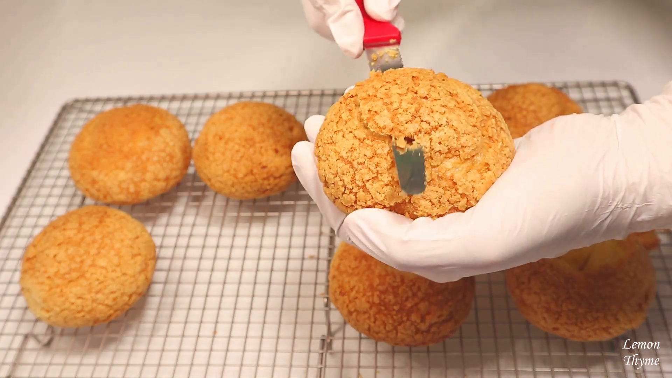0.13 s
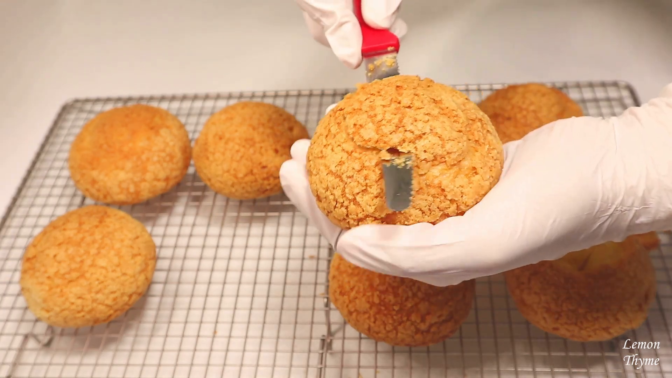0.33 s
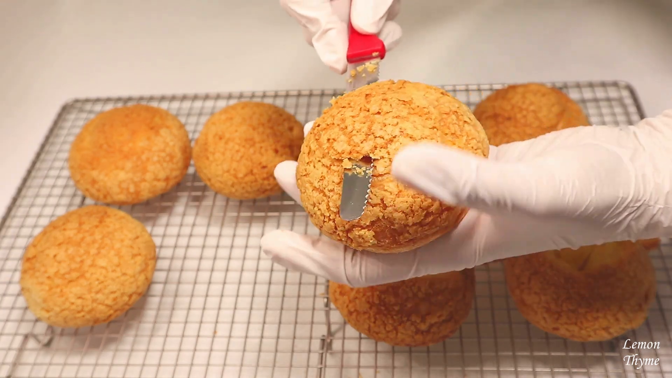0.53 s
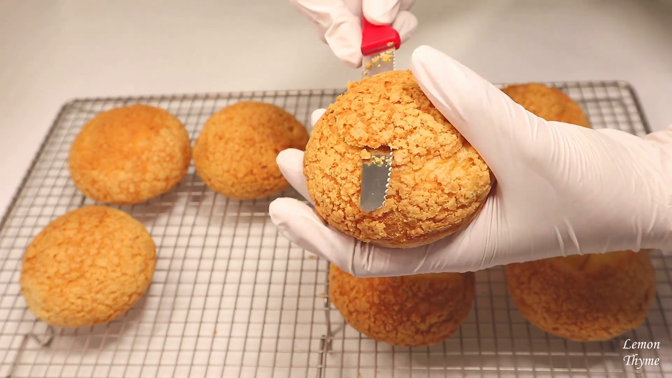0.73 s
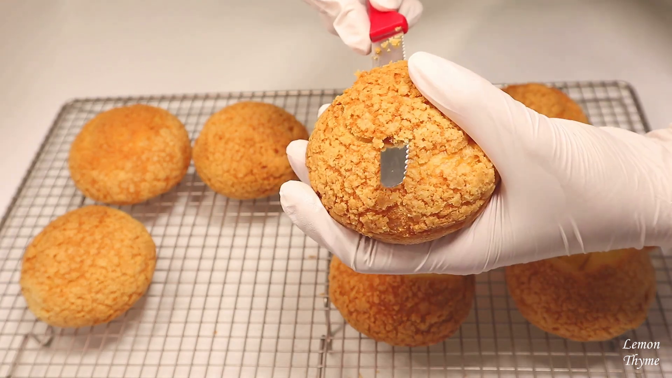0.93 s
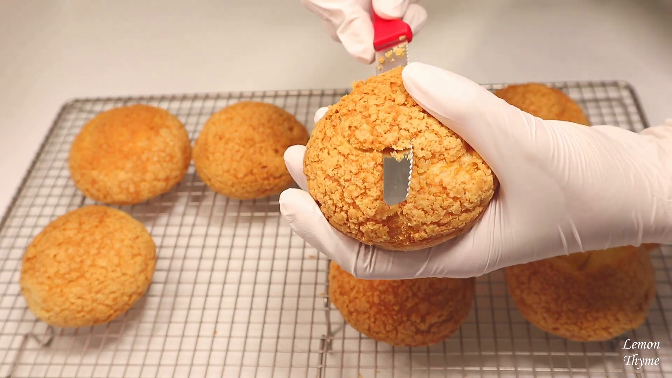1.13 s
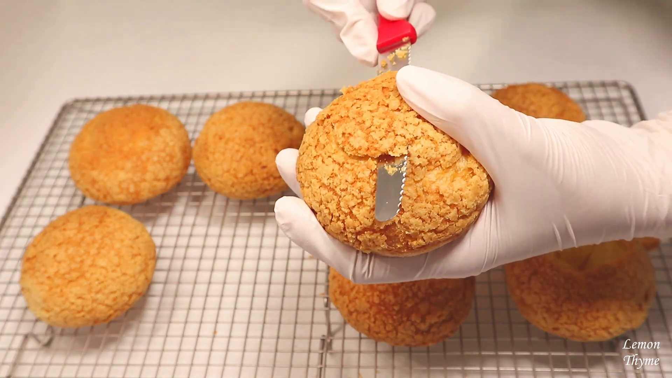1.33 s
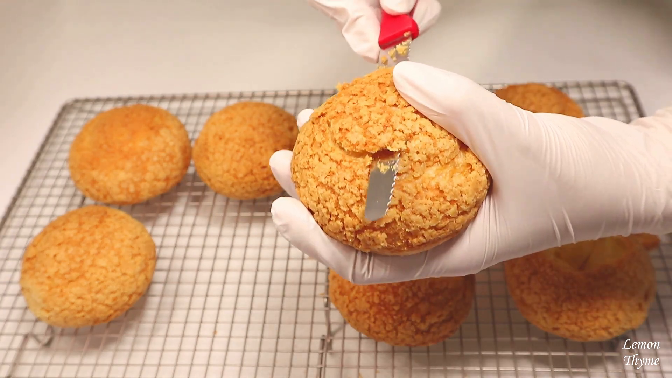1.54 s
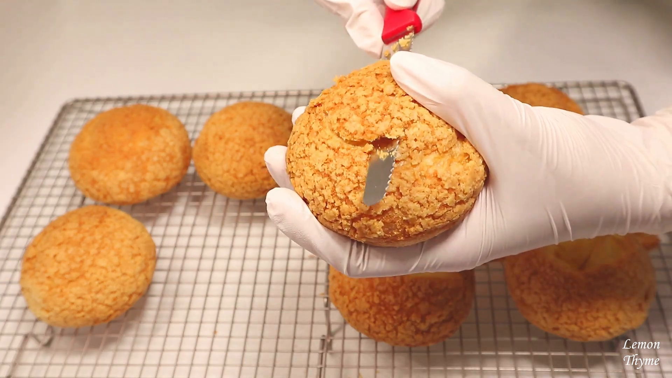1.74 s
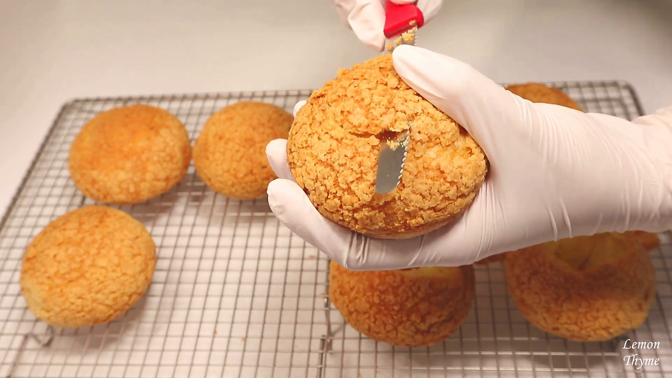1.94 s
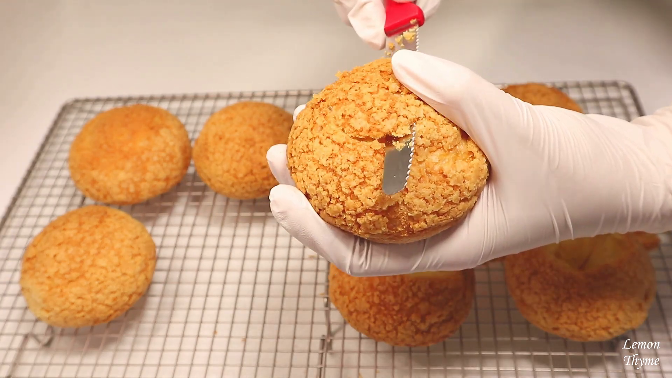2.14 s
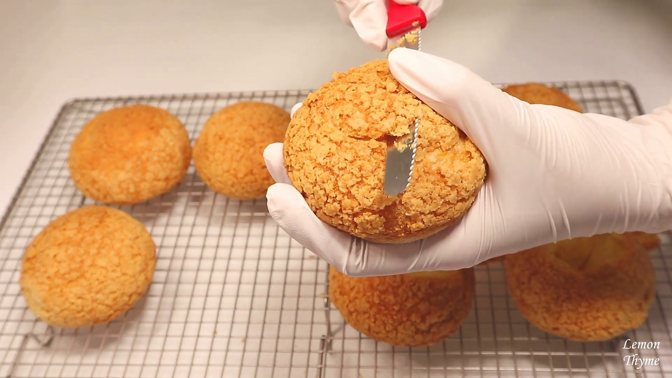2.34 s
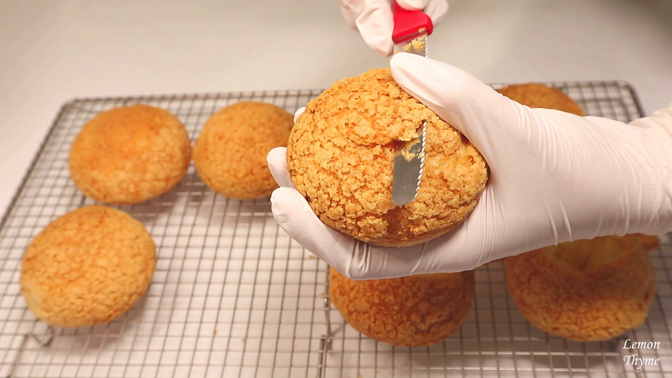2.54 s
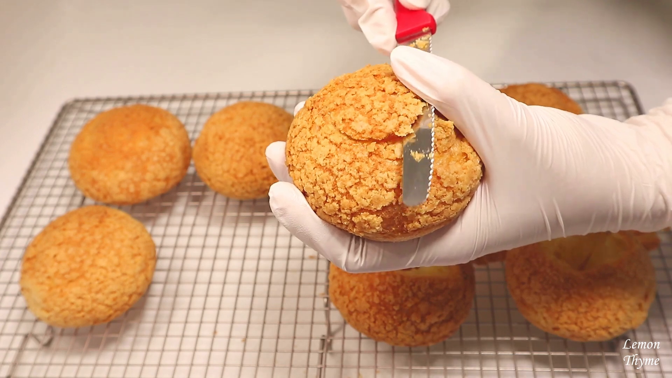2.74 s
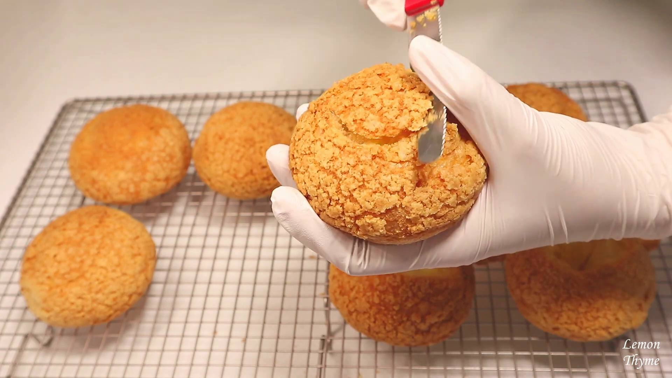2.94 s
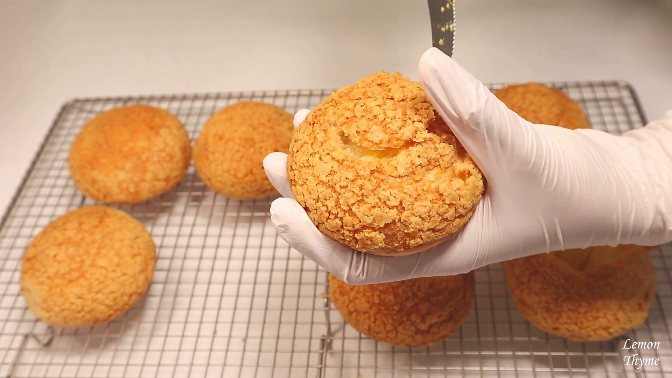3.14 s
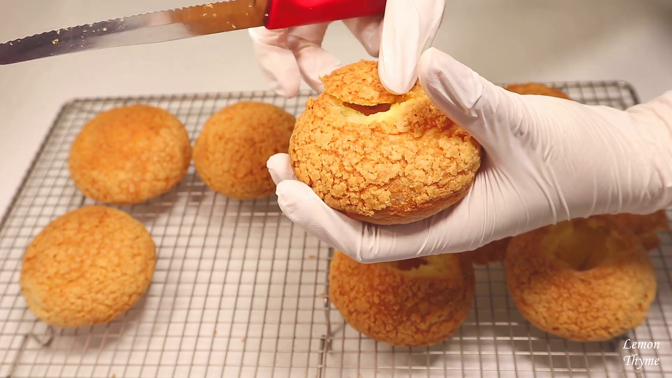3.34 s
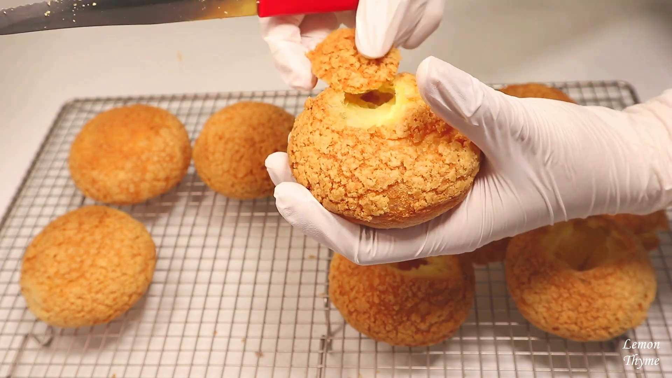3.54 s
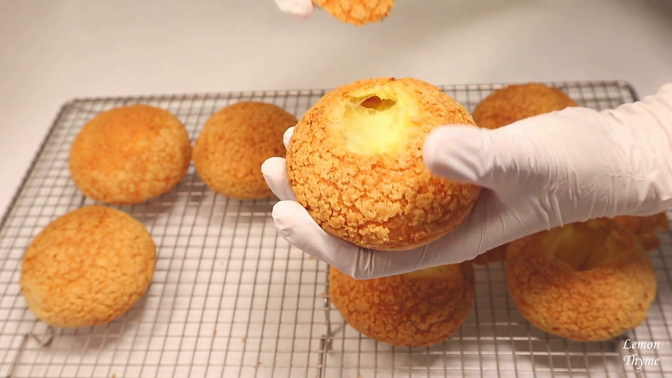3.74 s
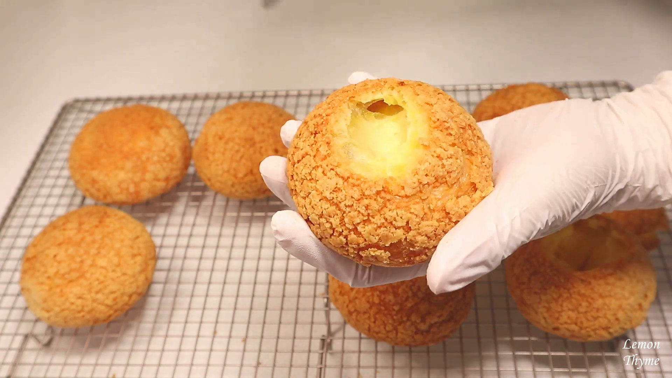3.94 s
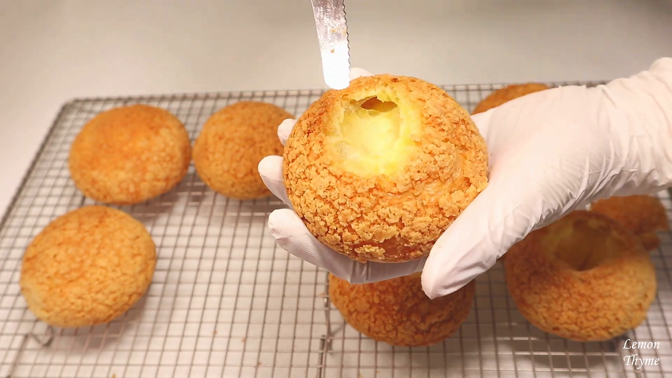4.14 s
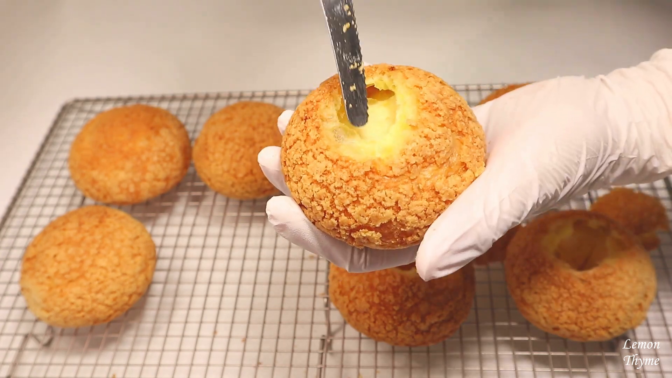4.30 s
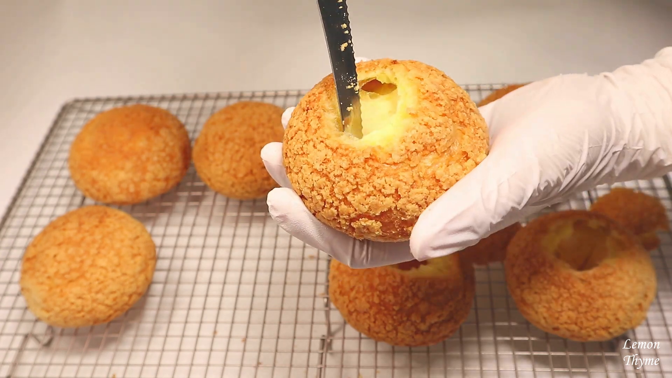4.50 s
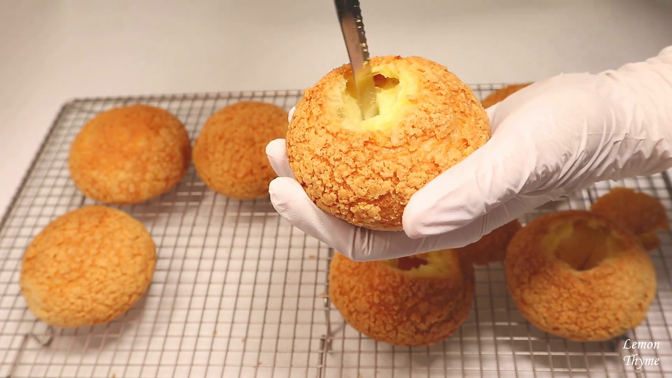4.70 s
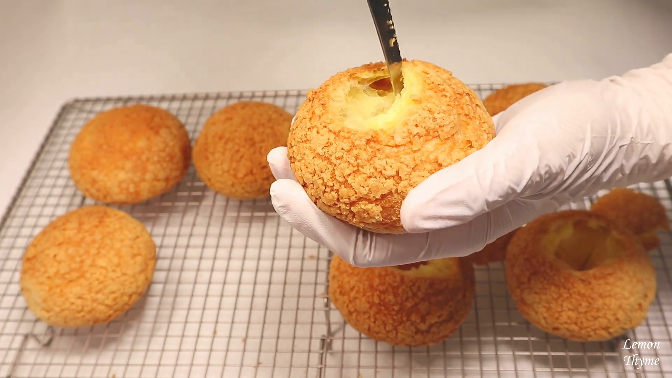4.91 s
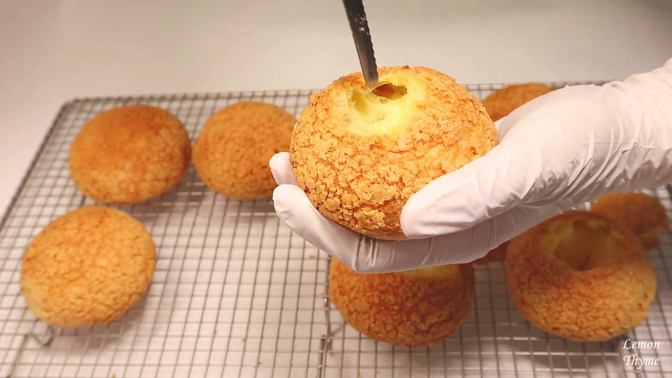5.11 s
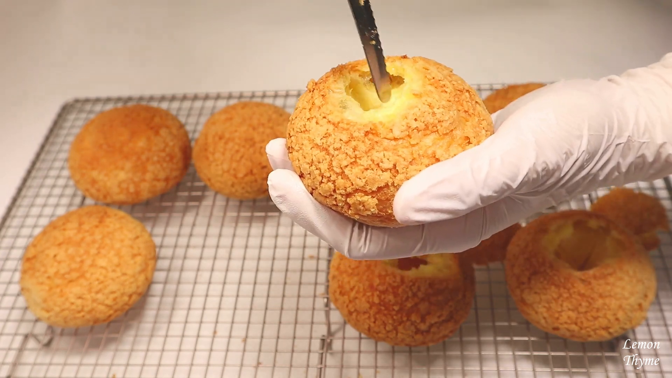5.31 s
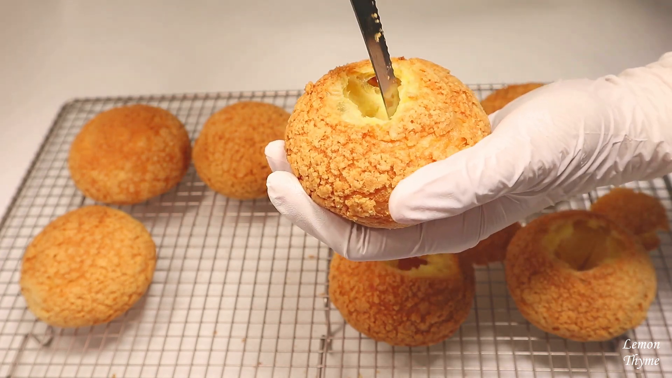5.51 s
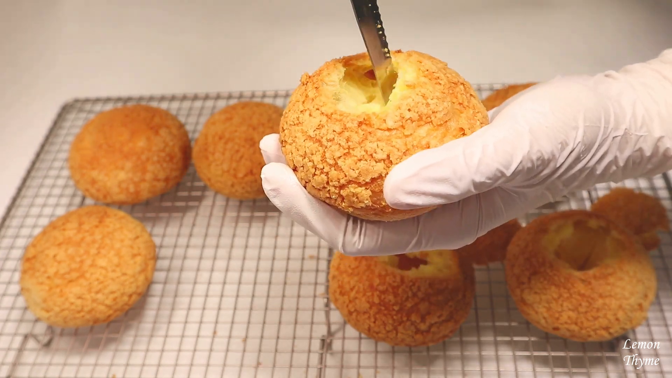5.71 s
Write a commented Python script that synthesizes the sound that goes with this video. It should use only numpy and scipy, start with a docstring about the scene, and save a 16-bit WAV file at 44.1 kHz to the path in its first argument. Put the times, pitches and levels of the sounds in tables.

```python
"""Knife sawing a crisp pastry puff

A small serrated knife saws round the crust of a hollow puff held near a stereo microphone: bursts of
crunch are tiny random fractures through crust, fizz and hollow resonances. Larger flakes snap singly
as ringing jolts; thumps are decaying sines. The lid is pulled off, then the blade probes the soft inside
with a few ticks and a dull knock. Behind lies a quiet kitchen of filtered noise and a narrow hum."""
import sys
import numpy as np
from scipy import signal
from scipy.io import wavfile
from scipy.ndimage import uniform_filter1d

SR = 44100
rng = np.random.default_rng(int(sys.argv[2]) if len(sys.argv) > 2 else 0)


def unload_audio(sound):
    """Save the sound as a 16-bit wav file, at the path given as the first command line argument."""
    columns = np.transpose(np.atleast_2d(sound))
    # keep every value between -1 and 1, then stretch to whole-number steps
    steps = np.round(np.clip(columns, -1, 1) * 32767)
    wavfile.write(sys.argv[1], SR, steps.astype(np.int16))


N = 258426

# Bursts of crunch: blade strokes, crumbling after snaps, lid pulls and late probing. Each row: middle in
# seconds, half length in seconds, level in dB, depth in dB re level, fizz in dB re level, crust pitch in Hz.
CRUNCHES = [(0.024, .017, -49, 1, 9.5, 930), (0.119, 0.025, -51.5, 3.5, -4, 1230),
            (.21, 0.023, -52.5, 0.5, -4, 990), (.265, 0.024, -45.5, -5.5, -5, 2030),
            (0.374, 0.033, -50, -4, -7, 1950), (.438, 0.033, -58, -5, 4, 1099),
            (0.587, 0.022, -56, -15, 7.5, 2500), (0.795, .023, -54.5, -28, 1, 4830),
            (.919, 0.024, -57.5, -6, -6, 1260), (1.02, 0.047, -54.5, -11, -3.5, 1190),
            (1.147, 0.028, -50, 0, -0.5, 1950), (1.285, 0.013, -46.5, -1, -1.5, 930),
            (1.389, 0.033, -50.5, -1, -11, 1305), (1.664, .028, -45.5, -6, -1.5, 1870),
            (1.891, .02, -47, -9.5, 2, 2670), (2.019, 0.0066, -39, -8.5, -10, 1370),
            (2.099, 0.022, -43.5, -3.5, -8, 1850), (2.237, 0.029, -49.5, -6, -3, 1350),
            (2.337, 0.031, -41, -4.5, -3.5, 2600), (2.449, 0.034, -48.5, -3.5, -4.5, 3960),
            (2.568, 0.029, -39, -8.5, -2.5, 2360), (2.676, 0.03, -39, -6.5, -6.5, 1285),
            (2.743, 0.064, -50.5, -2.5, -2.5, 2560), (2.848, 0.0084, -51, -35, 6, 6960),
            (2.892, 0.043, -58.5, -35, 3.5, 5200), (3.143, .032, -45, -7.5, 4, 2260),
            (3.228, 0.014, -45.5, -35, 2.5, 2620), (3.334, 0.043, -50, -4.5, 0.5, 1040),
            (3.385, 0.028, -51, -1.5, -2.5, 1000), (3.454, 0.01, -57.5, -25, 8, 6700),
            (3.489, 0.018, -47.5, -5, 7, 1000), (3.536, 0.02, -43, -9, 1, 2440),
            (3.62, 0.013, -37.5, -17, -2, 2400), (3.708, 0.023, -56, -10, 11.5, 2700),
            (4.685, .018, -61, -5.5, -14, 1660), (4.799, 0.013, -71.5, 10.5, -6, 805),
            (4.94, 0.018, -66.5, -3, -10, 930), (5.08, 0.096, -73, -3, 4, 4100),
            (5.624, 0.031, -80.5, -8, 13, 3120), (5.852, .013, -60.5, 6, -25, 910)]
# Single snaps of flakes. Each row: start in seconds, nominal level in dB, pitch in Hz,
# crack in dB re level, bright tick in dB re level.
SNAPS = [(.007, -19, 9300, -1.5, 3.5), (0.0257, -20.5, 6700, -10, -17), (.0296, -21.5, 6900, -26, -3.5),
         (.0754, -35.5, 1980, -10, 0), (0.0817, -32.5, 916, 3, 2), (0.1057, -36, 1210, 0, -4),
         (0.1435, -33.5, 1370, 0, -11), (.213, -35, 927, -9, -10), (0.2484, -30.5, 905, -19, 5),
         (0.2536, -29.5, 2197, -6, -8), (.273, -29.5, 2090, 7, 2), (.3457, -34, 2440, 1, -3),
         (0.4323, -31, 6160, -15, -14), (0.4456, -40.5, 830, -1, -3), (0.535, -43, 1410, -2, -2),
         (0.5711, -43, 1540, 4, -9), (0.6693, -13.5, 3760, -22, -21), (0.6996, -23.5, 2900, -33, -2),
         (0.75, -34, 4680, -24, -18), (0.7713, -33, 6140, -11, -11), (.836, -44, 1050, 10.5, 0),
         (0.9116, -41, 1040, -2, 4), (.9745, -35.5, 3340, 11, 2), (1.0979, -36.5, 1400, -4, -7),
         (1.2444, -42.5, 2710, 10, 7), (1.2871, -35, 1600, -22, 0.5), (1.335, -44.5, 920, -6, 4),
         (1.3746, -26, 1380, -1.5, -4.5), (1.3866, -33, 1390, -6, -6), (1.436, -21.5, 1150, -4.5, -12),
         (1.5029, -32.5, 1270, 12, -1), (1.5253, -39, 1200, 8, -3), (1.5321, -32, 1320, 6.5, -6),
         (1.6624, -32, 2000, 11, 3), (1.7599, -40, 3320, 11, 5), (1.768, -21, 4030, -3, 1),
         (1.8273, -13.5, 3670, -15, -18), (1.849, -31, 3500, -9, -17), (1.8863, -49, 820, 0, 2),
         (1.8979, -30.5, 2340, -27, 2.5), (1.9648, -37.5, 2483, 3, -1), (2.0177, -34.5, 2030, 12.5, 0),
         (2.0922, -26.5, 2330, 7.5, -6), (2.2299, -32, 3740, -8, -18), (2.244, -41, 1400, -17, 4),
         (2.2863, -40, 1040, -5, 2), (2.3488, -20, 2440, -3, -16), (2.43, -26, 3830, -6, -12),
         (2.4549, -27.5, 3924, -9, -4), (2.5432, -26, 2210, -26, -4), (2.6302, -29.5, 4636, 4, -0.5),
         (2.6845, -32.5, 2630, -12, 5), (2.7364, -30.5, 2550, 5, 0), (2.7763, -24, 3140, -16, -0.5),
         (2.79, -34, 2900, -6, -8), (2.8423, -12, 6850, -24, -8), (2.9397, -23.5, 7120, -11, -15),
         (3.0749, -42.5, 1890, 13.5, 3), (3.0859, -40, 2000, 12.5, -13), (3.1286, -21.5, 4774, -20, -23),
         (3.2209, -26.5, 2750, -19, 1.5), (3.293, -39, 2720, -16, 4), (3.3188, -31.5, 1060, 7, -3),
         (3.338, -23.5, 4600, -6, -13), (3.449, -21.5, 6500, -21, -2), (3.4835, -22.5, 990, -1.5, -4.5),
         (3.5366, -12, 2300, -26, -7.5), (3.5511, -22.5, 2390, -9, -21), (3.5905, -34, 4330, 7, 7),
         (3.597, -31, 2390, 1, -3), (3.6133, -31, 2380, 5, -18), (3.6182, -15, 2500, 2, -5.5),
         (3.646, -36, 2490, 12.5, -15), (3.6824, -33, 4300, 5, -20), (3.6962, -28, 2820, -9, 0),
         (3.7385, -26, 5030, -14, -10), (3.769, -29, 2700, -21, -0.5), (3.812, -17, 2880, -2, 3.5),
         (3.9103, -29, 2520, -14, -19), (4.485, -29, 2250, 8, -15), (4.516, -31.5, 8160, -1, -9),
         (4.68, -49, 1670, 1, -8), (4.8891, -45.5, 4020, -22, 0), (4.928, -46.5, 6230, -30, 3),
         (5.8037, -36, 1010, -9, -20), (5.853, -42, 1000, -8, -20)]
# Rustle of crumbs and gloved hand. Each row: time in seconds, level in dB, brightness in dB re level.
RUSTLE = [(0, -58, 9), (.23, -58.5, -4.5), (.44, -70.5, 9.5), (.9, -71.5, 10), (1.21, -63.5, -1.5),
          (1.89, -61.5, 4), (2.2, -70.5, 8.5), (2.75, -70.5, 10), (3.0, -75.5, 14.5), (3.4, -69, 1.5),
          (3.55, -46.5, -11), (3.72, -49, -4), (3.82, -56.5, 10.5), (4.0, -66, 13), (4.1, -75, 9),
          (4.91, -80.5, 10), (5.21, -86.5, 7)]
# Dull thumps as the shell gives way. Each row: start in seconds, nominal level in dB, pitch in Hz.
THUMPS = [(0.272, -34, 129), (0.384, -37, 142), (1.149, -38.5, 90), (1.887, -39.5, 496), (2.348, -53, 239),
          (2.691, -32.5, 99), (2.74, -35.5, 204), (3.0771, -31.5, 460), (3.086, -33, 490),
          (3.131, -30, 440), (3.15, -29.5, 515), (3.319, -31, 163), (4.806, -55, 139), (5.8038, -34.5, 474)]
# Modes of the loosened lid and rim. Each row: frequency in Hz, width in Hz, gain in dB.
LID_MODES = [(2390, 420, -0.5), (4350, 310, -1), (6060, 700, -0.5), (8100, 800, -2), (11600, 1600, -13.5)]
# Share of the sound that passes the lid and rim modes. Each row: time in seconds, share from 0 to 1.
LOOSE_SHARE = [(3.49, 0), (3.52, 0.34), (3.7, 0.7), (4.0, 0.19), (4.4, 0.82), (4.6, 0.57), (4.66, 0)]
# Spectrum of the crust crunch. Each row: frequency in Hz, relative gain in dB.
BODY_TONE = [(350, -33.5), (600, -13), (722, 2.5), (1420, 3), (1780, -2), (2040, 4), (3550, 2), (4020, 2.5),
             (7000, -3), (9100, -22), (15400, -120)]
# Spectrum of the finest fractures. Each row: frequency in Hz, relative gain in dB.
FIZZ_TONE = [(2650, -12), (4500, -9), (7920, -10), (8690, -11), (12400, -10.5), (15500, -14.5),
             (16200, -18), (16500, -92.5)]
# Spectrum of the push through the palm. Each row: frequency in Hz, relative gain in dB.
THUD_TONE = [(29, -50), (50, -8), (92, 1.5), (222, 0.5), (330, -1.5), (430, -23), (730, -120)]
# Reflections off nearby surfaces. Each row: left delay in seconds, right delay in seconds, gain in dB.
ECHOES = [(.0011, .0008, -29.5), (.0027, 0.0035, -14), (.0052, .0046, -16.5)]
# Spectrum of the hiss. Each row: frequency in Hz, relative gain in dB.
HISS_TONE = [(65, -53), (110, -10.5), (171, -5.5), (271, -8.5), (439, -12.5), (726, -18), (2160, -21),
             (3280, -22.5), (14500, -24), (15500, -24), (16500, -17.5)]
# Left-right likeness of hiss and rumble. Each row: frequency in Hz, correlation from -1 to 1.
ROOM_SAME = [(30, 0.31), (300, 0.31), (3000, 0), (12000, 0.04)]
# Course of the low kitchen rumble. Each row: time in seconds, level in dB.
RUMBLE_COURSE = [(0, -59.5), (0.519, -54.5), (.93, -60), (1.68, -61), (3.95, -56), (4.32, -58.5),
                 (5.86, -62)]
# Spectrum of the rumble. Each row: frequency in Hz, relative gain in dB.
RUMBLE_TONE = [(7.1, -40), (12, 1), (65, 3.5), (130, -13.5), (170, -8.5), (290, -120)]
# Brief dip of the whole level. One row: middle in seconds, half width in seconds, gain in dB.
DIP = (3.2775, .0105, -24)

HOLLOW_HZ, HOLLOW_WIDTH_HZ = 480, 210  # air inside the shell
RISE_SHARE = 0.61  # part of a burst that lies before its top
THUD_DB, HOLLOW_DB, CRUST_RING_DB = -0.5, -2.5, -5  # thud and hollow re depth, crust ring re level
FLAKE_DB, CRUMBLE_DB = -3.5, -15.5  # flake ring re snap level, crumbling re first jolt
FLAKE_WIDTH, FLAKE_SKIRT = 0.31, 0.63  # ring widths as a share of the pitch
SNAP_HOLLOW_DB, HOLLOW_DB_PER_OCTAVE = -14.5, -12  # hollow at a 1 kHz flake; smaller flakes stir it less
SNAP_PAN_DB, PAN_SPREAD_DB = -2.5, 1  # left minus right
SPRAY_SHARE, SPRAY_S = 0.7, 0.0012  # finest splinters around a break
# lows of the rustle: strong while the blade saws, thin from the end of the cut
RUSTLE_DEPTH_DB, CUT_THROUGH_DEPTH_DB, CUT_THROUGH_S = 9, -12, 2.75
THUMP_DAMPING_PER_S, DAMPING_PER_CYCLE = 66, 0.44
HISS_DB = -63
HUM_HZ, HUM_WIDTH_HZ, HUM_DB = 60, 3.5, -63
EDGE_HZ = 15900  # upper band limit


def crunch():
    """Dense breaks in each burst drive crust, fizz and hollow shell; a thinner rustle runs between."""
    coarse = fractures(5000, 1.8, 0.97)
    fine = fractures(9000, 1.2, 0.2)
    body = colour(flakes(coarse), BODY_TONE)
    fizz = colour(fine + 1.23 * coarse, FIZZ_TONE)
    thud = colour(fractures(800, 3, 0.6), THUD_TONE)
    hollow = evened(hollow_ring(fractures(1500, 1.8, 0.98)))
    out = np.zeros((2, N))
    for middle_s, half_s, db, depth_db, fizz_db, hz in CRUNCHES:
        rise_s, fall_s = 2 * half_s * RISE_SHARE, 2 * half_s * (1 - RISE_SHARE)
        top_s = middle_s + (rise_s - fall_s) / 2
        t = np.arange(-3 * rise_s, 3 * fall_s, 1 / SR)
        at = np.clip(((top_s + t) * SR).astype(int), 0, N - 1)
        crust = evened(ring(ring(coarse[:, at], hz, 1.0 * hz), hz, 0.29 * hz))
        layers = [(body, 0), (thud, depth_db + THUD_DB), (hollow, depth_db + HOLLOW_DB), (fizz, fizz_db)]
        sound = gain_of(CRUST_RING_DB) * crust
        sound = sound + sum(gain_of(layer_db) * layer[:, at] for layer, layer_db in layers)
        envelope = np.exp(-1.2 * (t / np.where(t < 0, rise_s, fall_s)) ** 2)
        add(out, top_s + t[0], gain_of(db) * sound * envelope)
    out += rustle_between(hollow)
    return out * gain_of([[-1.6], [1.6]])  # leans right


def rustle_between(hollow):
    """Crumbs break continuously; level, brightness and share of lows follow the time courses."""
    t = np.arange(N) / SR
    s, level_db, bright_db = np.transpose(RUSTLE)
    level_db, bright_db = np.interp(t, s, level_db), np.interp(t, s, bright_db)
    depth_db = np.interp(t, [CUT_THROUGH_S, CUT_THROUGH_S + 0.076], [RUSTLE_DEPTH_DB, CUT_THROUGH_DEPTH_DB])
    crumbs = fractures(4000, 1.4, 0.79)
    rustle = colour(flakes(crumbs), BODY_TONE)
    lows = signal.sosfiltfilt(signal.butter(2, 1700, fs=SR, output="sos"), rustle)
    deep = gain_of(depth_db) * (lows + 0.18 * hollow)
    bright = gain_of(bright_db) * colour(crumbs, FIZZ_TONE)
    return gain_of(level_db) * (rustle - lows + deep + bright)


def fractures(per_s, spread_db, same):
    """Random clumped breaks, most small, a few large; each reaches the two ports partly alike."""
    size_db = spread_db * np.minimum(rng.exponential(1, N), 4) + 3.1 * drift(170)
    size = gain_of(size_db) * (rng.random(N) < per_s / SR)
    shared, *apart = rng.standard_normal((3, N))
    same = np.clip(same, 0, 1)
    return evened(size * (same * shared + np.sqrt(1 - same ** 2) * np.array(apart)))


def flakes(breaks, count=10):
    """Every break belongs to a flake of some size and rings briefly at that flake's pitch."""
    which = rng.integers(0, count, N)
    pitches_hz = np.geomspace(750, 6500, count) * rng.uniform(1.0, 1.056, count)
    return sum(evened(ring(breaks * (which == k), hz, 0.16 * hz)) * np.sqrt(hz)
               for k, hz in enumerate(pitches_hz))


def hollow_ring(x):
    """Air in the shell: two damped resonances in series at one pitch, the second twice as wide."""
    return ring(ring(x, HOLLOW_HZ, HOLLOW_WIDTH_HZ), HOLLOW_HZ, 2 * HOLLOW_WIDTH_HZ)


def snaps():
    """A flake breaks in one jolt, then crumbles; it rings a few cycles over crack, tick and hollow."""
    out, t = np.zeros((2, N)), np.arange(1300) / SR
    crack_band = signal.butter(2, [1000, 6000], "bandpass", fs=SR, output="sos")
    tick_band = signal.butter(2, [6000, 13000], "bandpass", fs=SR, output="sos")
    chances = rng.standard_normal((len(SNAPS), 4, 1300))
    for (s, db, hz, crack_db, tick_db), chance in zip(SNAPS, chances):
        hollow_db = SNAP_HOLLOW_DB + HOLLOW_DB_PER_OCTAVE * np.log2(hz / 1000)
        pan_db = SNAP_PAN_DB + PAN_SPREAD_DB * chance[0, -1]
        crumbs = 0.73 * chance[0] + 0.5 * chance[1:3]
        crumbs = crumbs * (abs(chance[3]) > 1.2) * np.exp(-t / 0.0037)
        # rows: first jolt left and right, crumbling left and right
        jolts = np.stack([t == 0, t == 0, *(gain_of(CRUMBLE_DB) * crumbs)])
        flake = ring(ring(jolts, hz, FLAKE_WIDTH * hz), hz, FLAKE_SKIRT * hz)
        # finest splinters scatter over a millisecond and differ between the ports
        splinters = np.stack([*chance[1:3], 0 * t, 0 * t])
        spray = jolts + splinters * SPRAY_SHARE * np.exp(-t / SPRAY_S)
        crack = signal.sosfilt(crack_band, jolts)
        tick = signal.sosfilt(tick_band, spray)
        parts = [(flake, FLAKE_DB), (crack, crack_db), (tick, tick_db), (hollow_ring(jolts), hollow_db)]
        # each part is scaled by its peak without the crumbling
        sound = sum(gain_of(part_db) * (p[:2] + p[2:]) / abs(p[:2]).max() for p, part_db in parts)
        add(out, s, gain_of(db + np.array([[0.5], [-0.5]]) * pan_db) * sound)
    return out


def lid(x):
    """Once cut free, the lid and rim colour every break with their ring."""
    loose = np.clip(np.interp(np.arange(N) / SR, *np.transpose(LOOSE_SHARE)), 0, 1)
    # pi * width / SR brings each mode to gain 1 at its centre
    modes = sum(gain_of(db) * np.pi * width / SR * ring(x, hz, width) for hz, width, db in LID_MODES)
    return (1 - loose) * x + loose * gain_of(1.5) * modes


def thumps():
    """Each is a low swing with a soft start that dies in a few cycles."""
    out, t = np.zeros(N), np.arange(3000) / SR
    for s, db, hz in THUMPS:
        decay = np.exp(-(THUMP_DAMPING_PER_S + DAMPING_PER_CYCLE * hz) * t)
        onset = 1 - np.exp(-6.0 * hz * t)
        add(out, s, gain_of(db) * np.sin(2 * np.pi * hz * t) * decay * onset)
    return out * gain_of([[-2.2], [2.2]])  # leans right


def surroundings(x):
    """Path difference to the left port, a few near echoes and a short kitchen tail, unlike in each ear."""
    t = np.arange(12000) / SR
    taps = rng.standard_normal((2, len(t))) * gain_of(-60 * t / 0.176) * (t > 0.006)
    taps *= gain_of(-16.5) / np.linalg.norm(taps[0])
    delay_samples = np.array([[1.3], [0]]) + 16  # left port hears later; 16 centres the kernel
    taps[:, :33] += np.sinc(np.arange(33) - delay_samples) * np.hanning(33)
    for left_s, right_s, db in ECHOES:
        taps[[0, 1], [round(left_s * SR) + 16, round(right_s * SR) + 16]] += gain_of(db)
    return signal.fftconvolve(x, taps, axes=1)[:, 16:N + 16]


def room_tone():
    """Microphone hiss, a rumble that swells and sinks, and mains hum as narrow wavering noise."""
    frames, hz = N // 512 + 5, np.fft.rfftfreq(2048, 1 / SR)
    a, b, c, d = rng.standard_normal((frames, 1025, 4)).T
    same = np.clip(read(ROOM_SAME, hz), -1, 1)[:, None]
    left = a + 1j * b
    right = same * left + np.sqrt(1 - same ** 2) * (c + 1j * d)
    noise = np.array([left, right])

    def toned(tone):
        """Noise frames shaped by a spectrum table, overlap-added."""
        shaped = noise * gain_of(read(tone, hz))[:, None]
        return evened(signal.istft(shaped, nperseg=2048, noverlap=1536)[1][:, :N])

    hiss, rumble = toned(HISS_TONE), toned(RUMBLE_TONE)
    hum = evened(ring(rng.standard_normal((2, N)), HUM_HZ, HUM_WIDTH_HZ))
    rumble_db = np.interp(np.arange(N) / SR, *np.transpose(RUMBLE_COURSE)) + 2.0 * drift(4300)
    return gain_of(HISS_DB) * hiss + gain_of(rumble_db) * rumble + gain_of(HUM_DB) * hum


def gain_of(db):
    """Amplitude factor of a level in dB."""
    return 10 ** (np.asarray(db) / 20)


def evened(x):
    """Scales to rms 1."""
    return x / np.sqrt(np.mean(x ** 2) + 1e-20)


def read(points, hz):
    """Reads a spectrum table on a log frequency axis."""
    f, value = np.transpose(points)
    return np.interp(np.log(hz + 1), np.log(f + 1), value)


def colour(x, points):
    """Causal minimum-phase filter with the gains of a spectrum table; output at rms 1."""
    gain_db = np.maximum(read(points, abs(np.fft.fftfreq(8192, 1 / SR))), -100)
    log_gain = gain_db * np.log(10) / 20
    phase = -signal.hilbert(log_gain).imag
    taps = np.fft.ifft(np.exp(log_gain + 1j * phase)).real[:3000]
    return evened(signal.oaconvolve(x, taps[None], axes=1)[:, :N])


def ring(x, hz, width_hz):
    """One damped resonance."""
    r = np.exp(-np.pi * width_hz / SR)
    return signal.lfilter([1, 0, -1], [1, -2 * r * np.cos(2 * np.pi * hz / SR), r * r], x)


def drift(samples):
    """Smooth noise of rms 1 that changes over the given number of samples."""
    once = uniform_filter1d(rng.standard_normal(N), int(samples))
    return evened(uniform_filter1d(once, int(samples)))


def add(mix, s, sound):
    """Lays a sound into the mix at a time in seconds, cut at both ends of the mix."""
    at = round(s * SR)
    part = mix[..., max(at, 0):][..., :sound.shape[-1] + min(at, 0)]
    part += sound[..., max(-at, 0):][..., :part.shape[-1]]


def scene():
    """Pastry sounds in their surroundings over the room tone."""
    pastry = lid(crunch() + snaps()) + thumps()
    return surroundings(pastry) + room_tone()


def record(dry):
    """The level dips briefly, then the band is limited."""
    s, half_s, db = DIP
    dip_db = db * np.exp(-((np.arange(N) / SR - s) / half_s) ** 4)
    band = signal.firwin(511, EDGE_HZ, window=("kaiser", 9), fs=SR)
    return signal.oaconvolve(dry * gain_of(dip_db), band[None], "same")


dry = scene()
out = record(dry)
unload_audio(out)
```